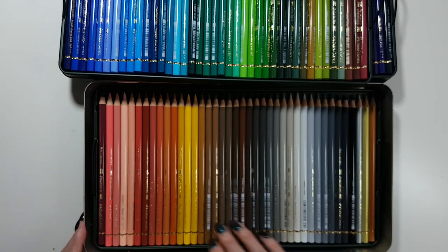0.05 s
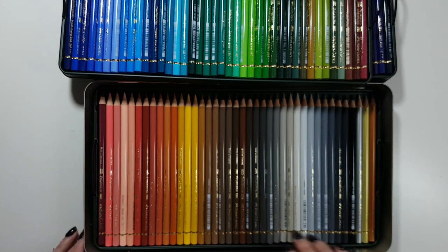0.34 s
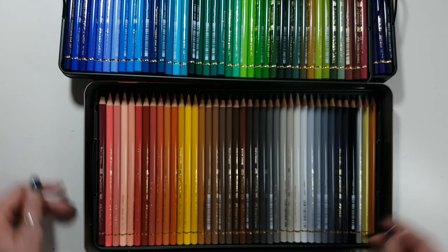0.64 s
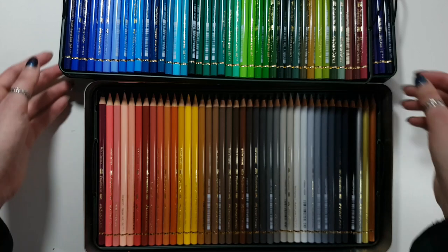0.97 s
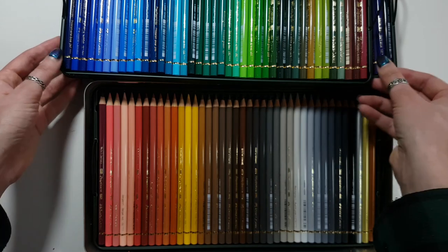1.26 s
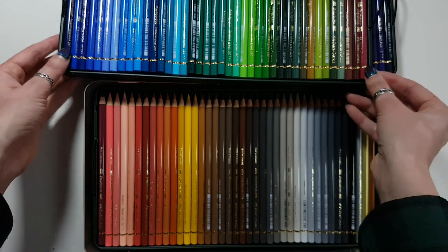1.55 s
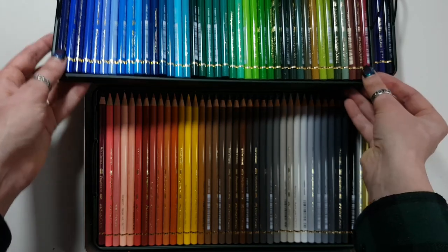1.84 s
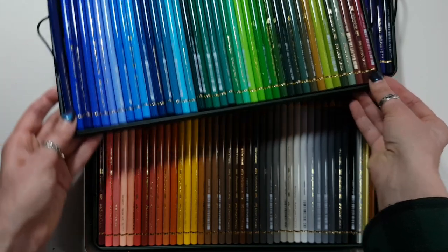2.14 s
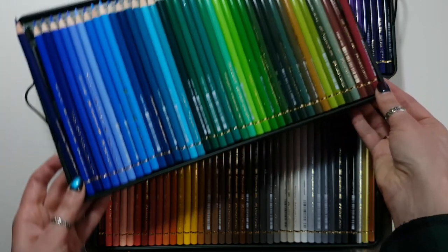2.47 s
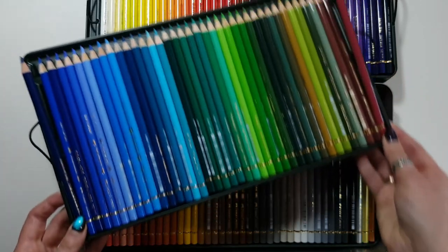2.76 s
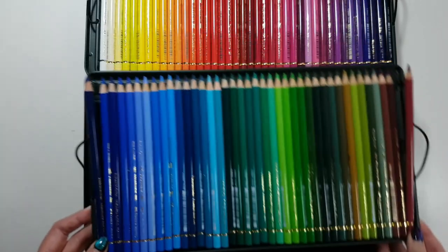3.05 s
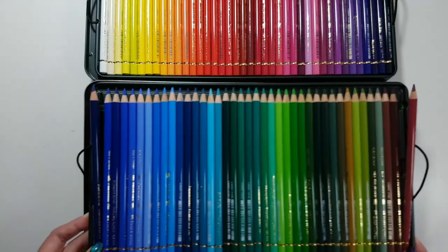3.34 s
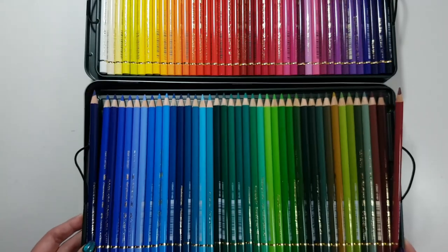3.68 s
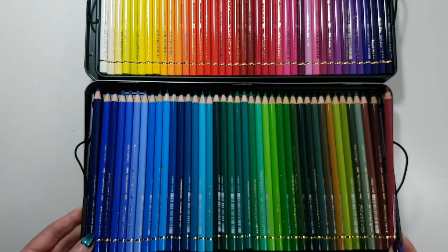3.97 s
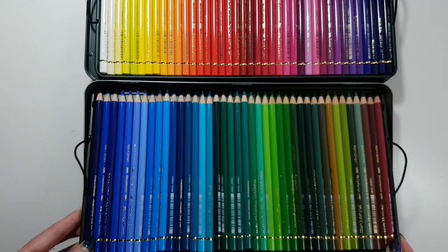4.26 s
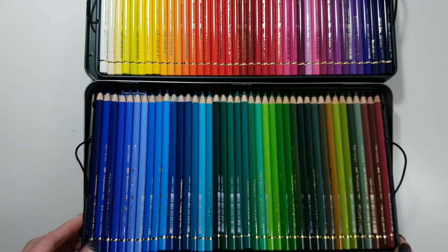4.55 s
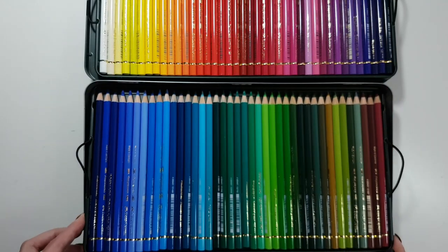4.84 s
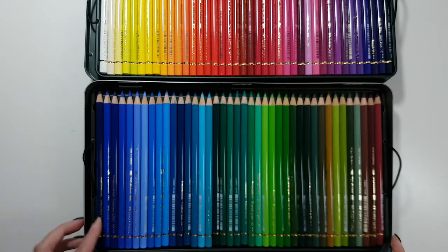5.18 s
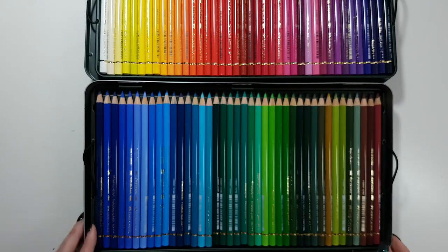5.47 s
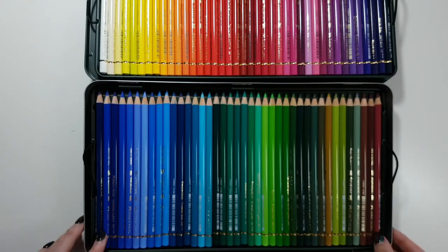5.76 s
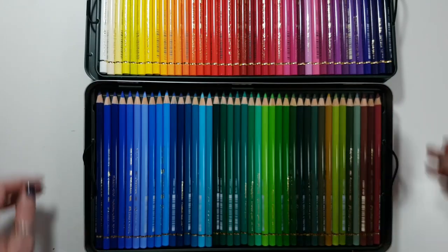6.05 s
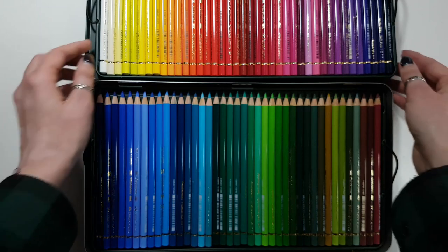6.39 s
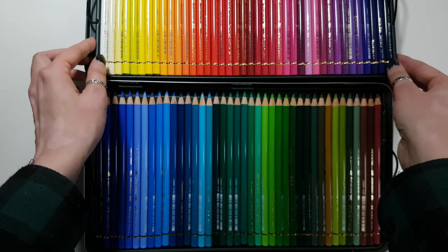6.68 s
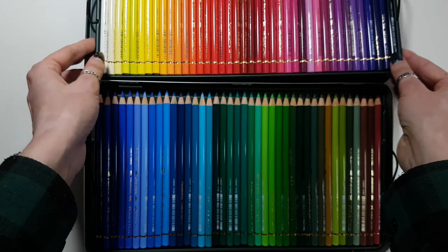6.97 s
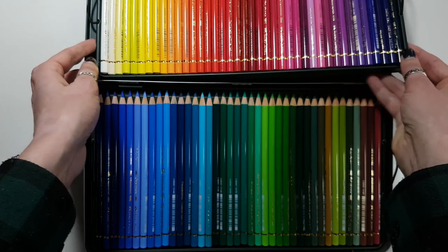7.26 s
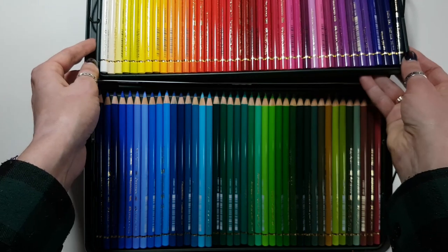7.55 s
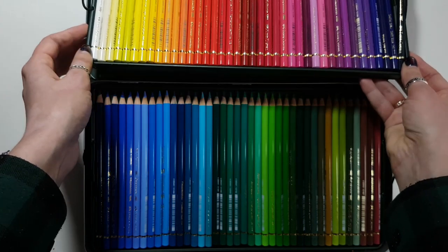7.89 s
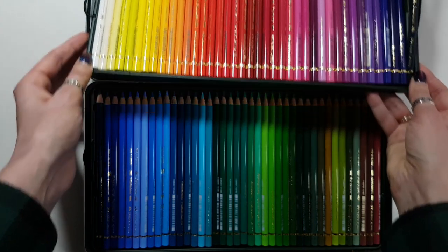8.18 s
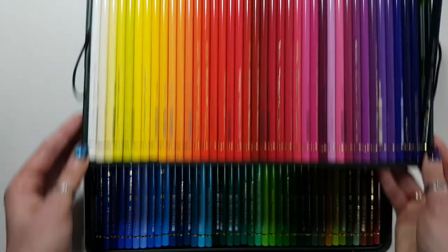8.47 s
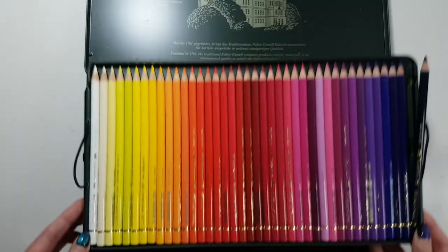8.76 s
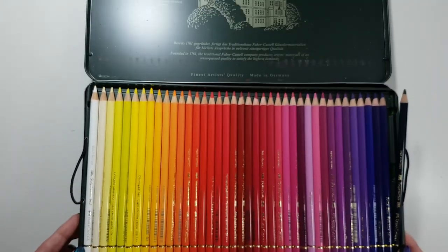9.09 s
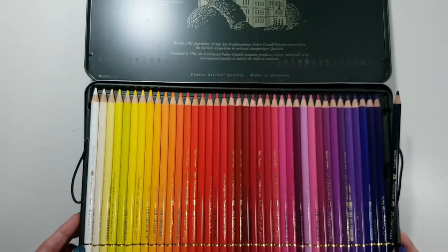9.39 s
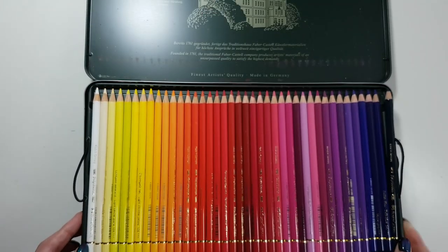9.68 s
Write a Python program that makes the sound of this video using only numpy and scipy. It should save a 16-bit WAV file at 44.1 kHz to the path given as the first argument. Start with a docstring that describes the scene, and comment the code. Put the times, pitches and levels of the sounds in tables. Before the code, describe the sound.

Coloured pencils click in a metal tin as their trays are lifted, scraped and stacked, one dropping in with a clatter and thump.

```python
"""Coloured pencils click and tumble under fingers in a metal tin, close by in a quiet room.
Then their trays are lifted out and stacked: they scrape, judder and knock against the rim,
and about five seconds in one drops home with a clatter and a low thump. Knocks are blows with
a short chatter, scrapes are streams of tiny slips; both ring through one body of wood, tray
and sheet metal. Faint room air and appliance hum lie underneath."""
import sys
import numpy as np
from scipy import signal
from scipy.fft import rfft, irfft
from scipy.io import wavfile
from scipy.ndimage import uniform_filter1d

SR = 44100
rng = np.random.default_rng(int(sys.argv[2]) if len(sys.argv) > 2 else 0)


def to_wav(sig):
    """Store sig (one row per channel, or 1-D mono) as 16-bit WAV at the path in sys.argv[1].

    Samples outside -1..1 are clipped; the rate is SR.
    """
    pcm = np.clip(np.atleast_2d(sig), -1, 1) * 32767
    pcm = np.round(pcm).astype(np.int16)
    wavfile.write(sys.argv[1], SR, pcm.T)  # frames by channels


N = 437913
HZ = np.fft.rfftfreq(N, 1 / SR)
# The five tone bands of a contact; their levels are set against the core.
THUD_HZ, CORE_HZ, CLACK_HZ, SNAP_HZ, FIZZ_HZ = 450, 1050, 2300, 5500, 13000
LEAD = 32  # samples kept free before a knock, so that the nearer side can lead


def knock(db, thud_db, snap_db, length_s, place, note_hz, size=8192):
    """A blow sets the loose pencils chattering briefly; the spot struck favours one note."""
    fall_db, spread_db, rise_s = 40, 4.0, .0003
    t = np.arange(size) / SR
    chatter = rng.standard_normal(size)
    chatter *= amp(spread_db * rng.standard_normal(size) - fall_db * t / length_s)
    chatter *= 1 - np.exp(-t / rise_s)
    force = 0.81 * chatter / np.linalg.norm(chatter)
    force[0] += 0.42 * np.sqrt(0.022 / length_s)  # a long, glancing contact has a weaker first blow
    fizz_db = snap_db - 4 + 0.4 * min(snap_db, 0)  # a soft contact loses its top fastest
    bands = [(THUD_HZ, thud_db), (CORE_HZ, 0), (CLACK_HZ, clack_level(snap_db, base_db=4.5)),
             (SNAP_HZ, snap_db), (FIZZ_HZ, fizz_db)]
    tone = lambda f: amp(curve(bands, f)) * (1 + amp(-4) * resonance(f, note_hz, 0.21 * note_hz))
    hit = signal.fftconvolve(force, minimum_phase(tone, size=2048))
    return amp(db) * placed(np.pad(hit, LEAD), place)


# Hits of trays and pencils:
# (time [s], level [dB], thud [dB], snap [dB], chatter length [s], place [- left, + right], note [Hz])
TRAY_HITS = [(0.036, 14.5, -4, -8, 0.058, -0.73, 910), (0.05, -1.5, 13, 6.5, 0.036, -0.1, 2140),
             (0.103, 11.5, -7, -5, 0.085, -0.71, 1980), (0.128, 1, -8, 1, 0.008, -0.12, 2050),
             (0.132, 8, -1, -8, 0.04, -1.1, 890), (0.15, -5, 3, 7, 0.011, -0.2, 1790),
             (0.186, 8.5, -3, -5, 0.02, 0, 1130), (0.227, 9.5, 11, -7.5, 0.021, -0.57, 910),
             (0.253, 12.5, -21, -12, 0.031, 0, 900), (0.267, -2, 12, -1, 0.02, 0.68, 890),
             (1.178, 0, -3, 2.5, 0.0089, 0.75, 2020), (1.208, -3, 4, -1.5, 0.058, 0.84, 980),
             (1.266, 6, 2, -16, 0.042, -0.44, 720), (1.375, -7, 6, -2, 0.033, 0.73, 685),
             (1.428, -7, 7, 4, 0.045, 0.68, 654), (1.628, -10.5, -1, -5, 0.02, -0.62, 1040),
             (1.78, 2, -7, -12, 0.033, -0.38, 890), (1.984, -7.5, 7, 0, 0.029, 0.9, 2100),
             (2.087, -7, 11, 0.5, 0.025, -1.06, 970), (2.14, 1.5, 3, -13, 0.022, 0.93, 1000),
             (2.18, 3.5, -5, -10.5, 0.0066, 0.36, 1050), (2.28, 2.5, -17, -8.5, 0.024, 0.42, 1030),
             (2.36, -5.5, -18, -11, 0.013, 0.41, 1370), (2.744, -9, 3, -6, 0.03, 0.9, 640),
             (2.862, -4.5, -10, -10, 0.027, 0.24, 1010), (2.927, -6.5, 3.5, -8, 0.016, 0.27, 650),
             (3.059, -5, 0, -4.5, 0.034, 0.89, 654), (3.092, -8, 2, 3, 0.033, 0.96, 680),
             (3.31, -19.5, -4, 11.5, 0.0097, 1, 1160), (3.608, -12, 15.5, -3, 0.057, -0.61, 840),
             (3.72, -20, 7, 10.5, 0.012, 0.72, 680), (3.889, -17, 8, 8.5, 0.047, 0, 674),
             (3.971, 5.5, 3, -10.5, 0.041, 1, 684), (3.99, -1.5, 11, -6, 0.04, 0.043, 760),
             (4.19, -12, 11, 6, 0.03, -1.1, 1500), (4.2, 6, 3.5, -3.5, 0.008, -0.95, 705),
             (4.205, 6, 3, -6.5, 0.034, -0.85, 695), (4.287, 2, 5, -3, 0.082, 0.74, 700),
             (4.311, 8.5, 3, -9.5, 0.009, 0.68, 680), (4.458, 1, -10, -10, 0.025, 0.97, 1500),
             (4.464, 3, -15, -4, 0.023, 0.78, 2000), (4.538, -7.5, 4, -17, 0.011, 0.48, 820),
             (4.876, -4.5, 8.5, 7, 0.053, -0.7, 705), (4.994, 3, -4, -9, 0.071, -1.03, 700),
             (5.144, 1.5, -6, -18, 0.022, -0.67, 800), (5.186, -1, 2, 11.5, 0.012, -0.63, 1270),
             (5.222, 13, 3.5, 0.5, 0.058, -0.77, 1520), (5.247, 25.5, -25, 1.5, 0.014, 0.676, 2950),
             (5.251, 12, 6, 2.5, 0.0033, 0.89, 2240), (5.256, 9, -1, -8, 0.02, 0.3, 1090),
             (5.278, 5, 17, 10, 0.027, 0.9, 1290), (5.287, 12, -1, 1.5, 0.026, 0.68, 1300),
             (5.749, -6.5, -1, -4, 0.029, -0.8, 660), (5.816, -2.5, -9, -25, 0.03, -0.55, 790),
             (5.885, -8.5, 8, 4.5, 0.076, 0.78, 1590), (5.952, 5, 3.5, -7, 0.056, 0.88, 1470),
             (6.42, 6, 3, -9, 0.058, 0.21, 685), (6.445, -8.5, 4, 4.5, 0.04, -0.75, 670),
             (6.559, -1.5, -1, -10, 0.049, 0.3, 1550), (7.005, -4, 2, -8, 0.023, -0.96, 680),
             (7.223, 1, 3, -22, 0.04, 0.6, 880), (7.3, 5, 1, -22, 0.027, 0.3, 870),
             (7.51, -0.5, -7, -15, 0.11, 0.35, 1050), (7.626, 3, 1, -12, 0.063, -0.75, 690),
             (7.665, 1.5, 3, -16, 0.059, 0.53, 680), (7.695, -20, -10, 22, 0.065, 0.24, 670),
             (7.917, -13.5, 11, 15, 0.067, -0.96, 900), (8.068, -4.5, -2, -5, 0.019, -0.61, 1950),
             (9.123, 4, 4.5, -14, 0.031, 0.59, 1170), (9.3337, 13.5, 0, -18.5, 0.0082, 0, 860),
             (9.342, 2.5, 6, -9, 0.022, 0.28, 790), (9.357, 0.5, 3, -3.5, 0.022, 0.59, 1300),
             (9.687, -9.5, -12, 14, 0.064, -0.52, 1300), (9.694, 6, 5.5, -5, 0.031, -0.77, 1040),
             (9.708, 4, -4, -12, 0.023, -0.18, 895), (9.784, -15.5, 27.5, 2, 0.015, 0.75, 800),
             (9.807, -23, -1, 19, 0.028, -0.57, 905), (9.825, -17.5, 7, 11, 0.023, 0.92, 1810)]

def knocks(trim_db=-1):
    """Trays and pencils strike the tin and each other."""
    out = np.zeros((2, N))
    for start, *blow in TRAY_HITS:
        add(out, start - LEAD / SR, knock(*blow))
    return amp(trim_db) * out


# Low bounces of a tray: (time [s], pitch [Hz], level [dB], decay t60 [s])
TRAY_BOUNCES = [(0.226, 110, -49, 0.27), (3.984, 76.3, -44, 0.49), (5.2473, 108.2, -12, 0.18),
                (5.318, 106, -21, 0.15), (9.471, 64.3, -33.5, 0.64)]

def thumps(rise_s=0.0069, size=30000):
    """A loaded tray bounces on its seat and swings at one low pitch."""
    out = np.zeros((2, N))
    t = np.arange(size) / SR
    for start, hz, db, t60 in TRAY_BOUNCES:
        envelope = amp(db - 60 * t / t60) * (1 - np.exp(-t / rise_s))
        add(out, start, placed(envelope * np.sin(2 * np.pi * hz * t), place=0.98))
    return out


def pressure(strokes, clack_db, fullest=0.4, half_width=0.46, squareness=4.1):
    """Each stroke swells, holds and lets go; gives the envelopes of core, clack and snap."""
    t = np.arange(0, N, 64) / SR
    power = 0
    for start, length, db, snap_db in strokes:
        progress = (t - start) / length
        swell = np.exp(-abs((progress - fullest) / half_width) ** squareness)
        bands_db = np.array([[0], [clack_level(snap_db, clack_db)], [snap_db]])
        power += (amp(db + bands_db) * swell) ** 2
    return [np.interp(np.arange(N) / SR, t, gain) for gain in np.sqrt(power)]


def friction(envelopes, place, slips_per_s, spread_db, smooth, flutter_db, thud_db, fizz_db):
    """Tiny slips of uneven size over a smooth rub; the pressure sets how hard and bright they are."""
    slips = (rng.random(N) < slips_per_s / SR) * rng.choice([-1, 1], N)
    slips = slips * amp(spread_db * np.minimum(rng.exponential(1, N), 3))
    force = np.sqrt(1 - smooth) * unit_rms(slips) + np.sqrt(smooth) * rng.standard_normal(N)
    grip = flutter(flutter_db, N, smoothing=500)
    tone = amp(curve([(THUD_HZ, thud_db), (CORE_HZ, 0), (SNAP_HZ, 0), (FIZZ_HZ, fizz_db)], HZ))
    spectrum = rfft(unit_rms(force * grip)) * tone
    out = np.zeros(N)
    for solo, envelope in zip(np.eye(3), envelopes):
        band = curve(list(zip([CORE_HZ, CLACK_HZ, SNAP_HZ], solo)), HZ)
        out += envelope * irfft(spectrum * band, N)
    return placed(out, place)


# Drags along the rim or over another tray: (time [s], length [s], level [dB], snap [dB])
TRAY_DRAGS = [(0.57, 0.072, -41, -5), (0.665, 0.088, -34, -1.5), (0.77, 0.21, -52, 7),
              (1.0, 0.052, -55, 15), (1.52, 0.17, -41, -13), (1.74, 0.085, -32.5, -3.5),
              (1.82, 0.12, -37.5, 2.5), (1.96, 0.17, -40.5, 5.5), (2.06, 0.062, -32, -5),
              (2.15, 0.059, -29.5, -5), (2.18, 0.25, -36, -1), (2.42, 0.35, -48.5, 3),
              (2.78, 0.56, -46, 5.5), (3.78, 0.2, -34.5, -7), (3.965, 0.094, -29, -4.5),
              (4.38, 0.049, -43, 10.5), (4.49, 0.12, -41, 0), (4.89, 0.21, -47, -1), (5.17, 0.1, -24.5, -8),
              (5.228, 0.06, -13, -3.5), (5.29, 0.11, -41, 8), (5.4, 0.22, -42.5, 0),
              (5.77, 0.38, -40.5, -2.5), (6.98, 0.13, -36.5, -3), (7.25, 0.15, -35, 0),
              (7.38, 0.074, -47, 9.5), (7.49, 0.16, -40.5, -5.5), (7.64, 0.28, -36.5, -7),
              (7.96, 0.16, -45, 2), (8.1, 0.091, -34, -4.5), (9.005, 0.03, -54, 14),
              (9.53, 0.28, -35, -8.5), (9.69, 0.052, -30, -1.5), (9.8, 0.19, -44, -3)]

def scrapes(trim_db=-5.5):
    """Both ends of a dragged tray scrape, each on its own."""
    envelopes = pressure(TRAY_DRAGS, clack_db=1.5)
    ends = [friction(envelopes, place, slips_per_s=450, spread_db=1.8, smooth=0.4,
                     flutter_db=2.0, thud_db=3.5, fizz_db=-1) for place in (-.7, .65)]
    return amp(trim_db) * sum(ends)


# Judders of a dragging tray edge: (time [s], length [s], pitch [Hz], width [Hz], level [dB])
EDGE_JUDDERS = [(1.767, 0.038, 940, 130, -42.5), (2.119, 0.059, 1010, 110, -46),
                (2.779, 0.46, 680, 210, -57.5), (3.961, 0.057, 990, 80, -43.5),
                (7.601, 0.21, 720, 190, -53), (7.714, 0.12, 1530, 90, -58), (9.556, 0.19, 950, 260, -47.5),
                (9.624, 0.037, 1656, 170, -45)]

def judders():
    """Stick and slip lock briefly onto one resonance: a hollow, grainy note."""
    out = np.zeros((2, N))
    f = np.fft.rfftfreq(SR, 1 / SR)
    for start, length, hz, width, db in EDGE_JUDDERS:
        note = irfft(rfft(rng.standard_normal(SR)) * resonance(f, hz, width))
        note *= flutter(depth_db=3, size=SR, smoothing=400)
        swell = signal.windows.tukey(round(length * SR), .6)
        add(out, start, amp(db) * placed(unit_rms(note[:len(swell)] * swell), place=.2))
    return out


# Pushes that roll the pencils in their grooves: (time [s], length [s], level [dB], snap [dB])
FINGER_PUSHES = [(-0.04, 0.25, -23, -3.5), (0.2, 0.086, -24, -1.5)]

def pencil_roll(trim_db=-1):
    """Six-sided pencils tumble against each other under the fingers."""
    envelopes = pressure(FINGER_PUSHES, clack_db=4.5)
    return amp(trim_db) * friction(envelopes, place=-0.17, slips_per_s=970, spread_db=-1.0,
                                   smooth=0.41, flutter_db=-0.5, thud_db=2, fizz_db=-4.5)


def finger_run(start_s=0.286, gap_s=0.0246, count=6, crest=0.59, crest_db=3, rise_db=-10, fade_db=-5):
    """A fingertip skips evenly from pencil to pencil: a row of clicks that swells and fades."""
    out = np.zeros((2, N))
    for k in range(count):
        past_crest = k / (count - 1) - crest
        db = crest_db + (rise_db if past_crest < 0 else fade_db) * np.tanh(4 * past_crest) ** 2
        click = knock(db, thud_db=-9, snap_db=-10, length_s=0.013, place=0.42, note_hz=1540)
        add(out, start_s + k * gap_s - LEAD / SR, click)
    return out


# Woody tone of the body: (frequency [Hz], level [dB])
BODY_TONE = [(40, -18.5), (110, -25.5), (200, -14), (300, -12), (450, -11), (700, -3), (1200, -3),
             (2200, -3), (3200, -7), (4500, -9.5), (6000, -14.5), (7500, -17), (9000, -22.5),
             (11500, -15.5), (16000, -30.5)]
# Ringing modes of the tin and its trays: (pitch [Hz], width [Hz], level against the body [dB])
TIN_MODES = [(116, 7, 28.5), (310, 37, 10.5), (655, 124, -1.5), (827, 9, -3), (908, 20, 1.5),
             (917, 25, -28), (1175, 38, -4.5), (1300, 33, -3), (1467, 66, -1.5), (1574, 16, -4),
             (1790, 28, -10), (1938, 15, 0.5), (2156, 25, -1.5), (2270, 37, -12), (2394, 7.3, 2),
             (2650, 14, 0), (2790, 61, -4.5)]

def tin(force):
    """A short woody response on which the modes of the sheet metal ring."""
    def tone(f):
        ring = sum(amp(db) * resonance(f, hz, width) for hz, width, db in TIN_MODES)
        return amp(curve(BODY_TONE, f)) * (1 + ring)
    return convolve(force, minimum_phase(tone))


# Length of the room's tail: (frequency [Hz], decay t60 [s])
ROOM_DECAY = [(100, 0.39), (400, 0.49), (2000, 0.37), (6000, 0.37), (14000, 0.024)]

def room(x, early_db=-11, early_t60=.05, tail_db=-15, predelay_s=.002, wide_above_hz=1500):
    """Quick reflections from desk and lid, then a faint tail; the bass is alike on both sides."""
    hz, t, noise = signal.stft(rng.standard_normal((2, SR // 2)), SR, nperseg=256)
    alike = (np.sinc(hz / wide_above_hz) * (hz < wide_above_hz))[:, None]
    noise[1] = alike * noise[0] + np.sqrt(1 - alike ** 2) * noise[1]
    response = 0
    for db, t60 in [(early_db, early_t60), (tail_db, curve(ROOM_DECAY, hz)[:, None])]:
        noise = np.roll(noise, noise.shape[2] // 2, axis=2)  # each decay starts on its own noise
        decay = signal.istft(noise * amp(-60 * t / t60), SR, nperseg=256)[1]
        response += amp(db) * decay / np.linalg.norm(decay[0])
    return convolve(x, np.pad(response, ((0, 0), (round(predelay_s * SR), 0))))


# Tone of the room air: (frequency [Hz], relative level [dB])
AIR_TONE = [(20, -11.5), (55, -7.5), (75, 1.5), (90, -6), (150, -10.5), (290, -5.5), (420, -10.5),
            (900, -10.5), (2400, -12), (4300, -20), (5800, -29), (8000, -33), (9500, -37), (13000, -32.5)]
# Hum and faint whine of appliances: (pitch [Hz], width [Hz], level [dB])
APPLIANCE_HUM = [(53.3, 7.5, -65.5), (117.66, 1.9, -60.5), (233.2, 3.7, -67.5), (305, 41, -71.5),
                 (3970, 30, -70.5), (4260, 21, -72.5)]
# How alike the air is on both sides: (frequency [Hz], shared power [0-1])
AIR_LIKENESS = [(60, 0.97), (250, 0.82), (500, 0.64), (900, 0.36), (1300, 0.85), (2500, 0), (3500, 0.12),
                (4300, 0.67), (6000, 0), (15000, 0.54)]

def room_tone(hiss_db=-51.5, hum_trim_db=-1):
    """Steady hiss and hum; the part common to both sides reaches the left first."""
    hiss = amp(hiss_db) * unit_rms(amp(curve(AIR_TONE, HZ)))
    hum_power = sum((amp(db + hum_trim_db) * unit_rms(resonance(HZ, hz, width))) ** 2
                    for hz, width, db in APPLIANCE_HUM)
    tone = np.sqrt(hiss ** 2 + hum_power)
    alike = curve(AIR_LIKENESS, HZ)
    shared = irfft(rfft(rng.standard_normal(N)) * tone * np.sqrt(alike), N)
    diffuse = irfft(rfft(rng.standard_normal((2, N))) * tone * np.sqrt(1 - alike), N)
    return placed(shared, place=-1.25) + diffuse


def clack_level(snap_db, base_db, limit_db=4.5):
    """A harder contact has more clack along with its snap, up to a limit."""
    return np.minimum(base_db + 0.85 * snap_db, limit_db)


def flutter(depth_db, size, smoothing):
    """A randomly wavering gain; size and smoothing are in samples."""
    return amp(depth_db * unit_rms(uniform_filter1d(rng.standard_normal(size), smoothing)))


def resonance(f, hz, width):
    """A resonance curve of height 1."""
    return 1 / (1 + (2 * (f - hz) / width) ** 2)


def placed(x, place, spacing_s=0.00021):
    """Mono to stereo: sound from one side reaches the far side a little later."""
    lag = np.array([[.5], [-.5]]) * place * spacing_s
    return irfft(rfft(x) * np.exp(-2j * np.pi * np.fft.rfftfreq(len(x), 1 / SR) * lag), len(x))


def minimum_phase(gain, size=16384):
    """The quickest impulse response with the given gain as a function of frequency."""
    log_gain = np.log(gain(abs(np.fft.fftfreq(size, 1 / SR))))
    return np.fft.ifft(np.exp(np.conj(signal.hilbert(log_gain)))).real


def convolve(x, response):
    """Filters along time and keeps the length."""
    return signal.oaconvolve(np.atleast_2d(x), np.atleast_2d(response), axes=1)[:, :x.shape[-1]]


def curve(points, hz):
    """Reads a table on a log-frequency axis."""
    f, value = np.transpose(points)
    return np.interp(np.log(hz + 1), np.log(f + 1), value)


def add(mix, start_s, sound):
    """Mixes a stereo sound in at the given time."""
    part = mix[:, max(round(start_s * SR), 0):][:, :sound.shape[-1]]
    part += sound[..., :part.shape[1]]


def amp(db):
    """Decibels to gain."""
    return 10 ** (np.asarray(db) / 20)


def unit_rms(x):
    """Scales to rms 1."""
    return x / np.sqrt(np.mean(x ** 2) + 1e-20)


def scene():
    """The ringing tin and the judders sound in the room, over dry thumps and the room tone."""
    direct = tin(knocks() + finger_run() + pencil_roll() + scrapes()) + judders()
    contacts = direct + room(direct) + thumps()
    leftward = np.array([[1], [-1]])
    # The high treble leans left, everything below it slightly right.
    lean_db = curve([(100, -.35), (500, -.5), (1000, -.1), (2000, -.3), (5000, -.4), (8000, 1.3)], HZ)
    contacts = irfft(rfft(contacts) * amp(leftward * lean_db), N)
    return contacts + room_tone() * amp(-0.88 * leftward)


def record(dry, ceiling=0.93, cutoff_hz=15800):
    """A soft clip rounds off the loudest peak; a steep low-pass trims the very top."""
    rounded = dry / (1 + (dry / ceiling) ** 6) ** (1 / 6)
    lowpass = signal.firwin(511, cutoff_hz, window=("kaiser", 9), fs=SR)
    return signal.oaconvolve(rounded, lowpass[None], "same")


dry = scene()
out = record(dry)
to_wav(out)
```